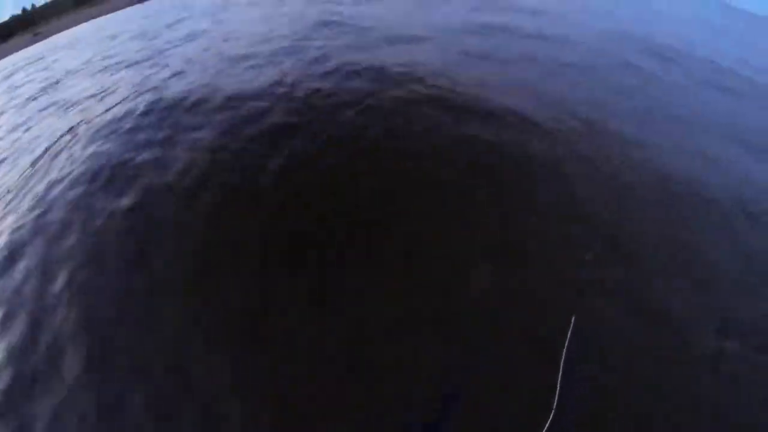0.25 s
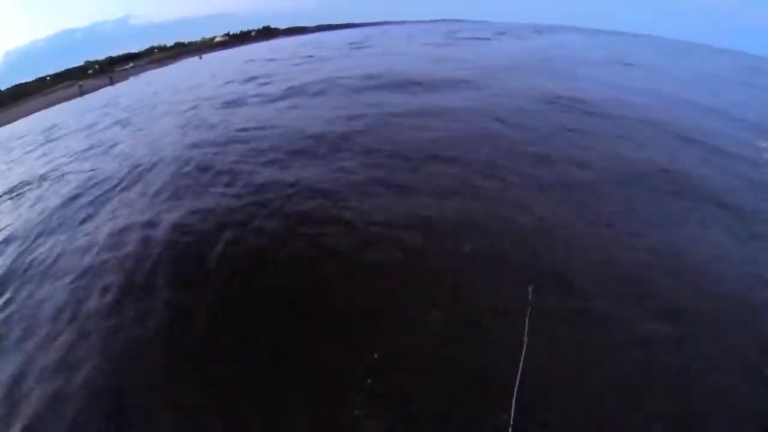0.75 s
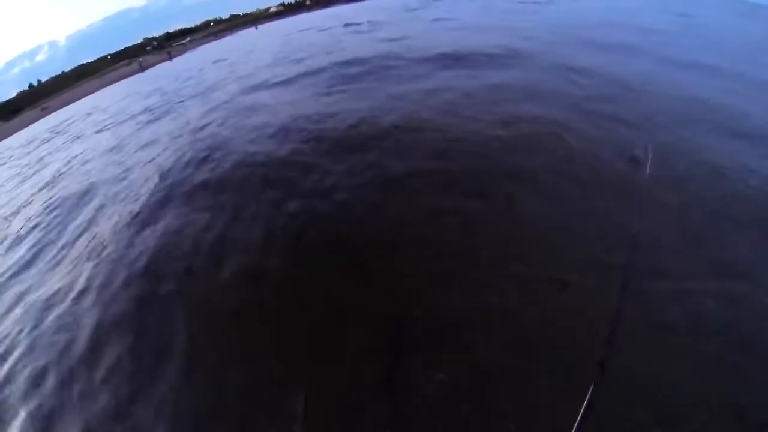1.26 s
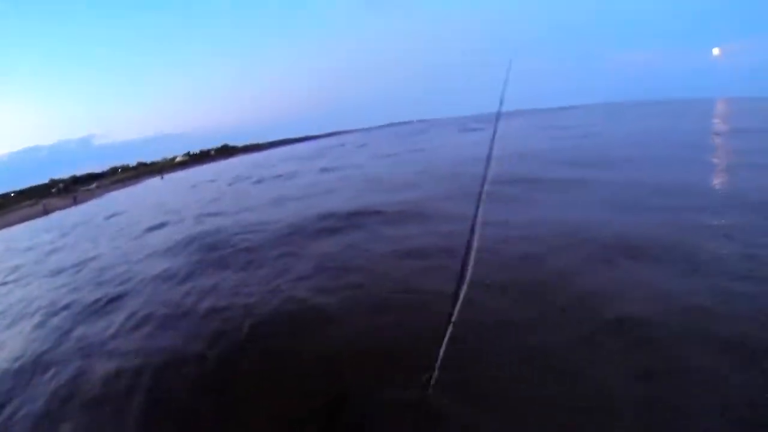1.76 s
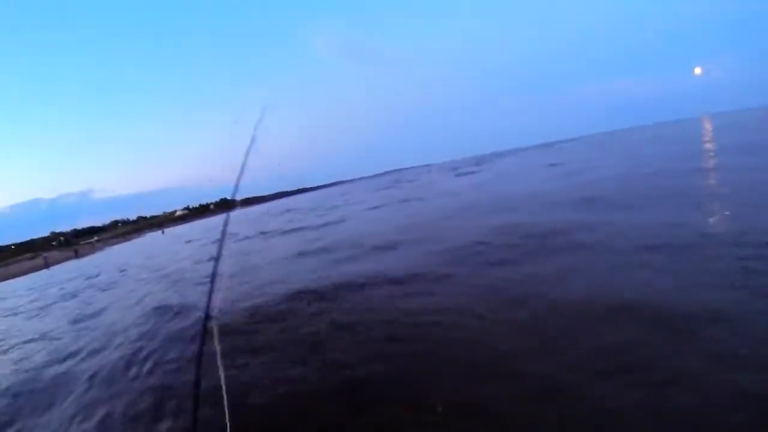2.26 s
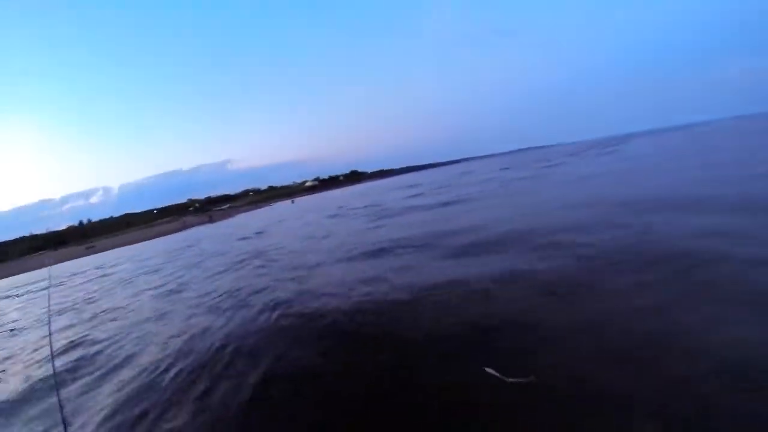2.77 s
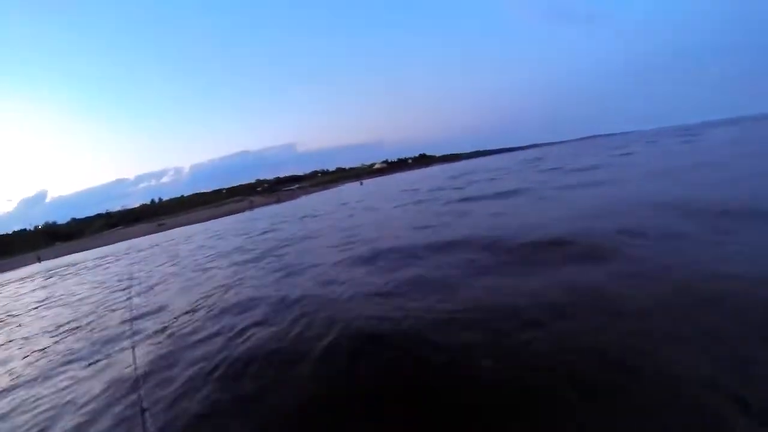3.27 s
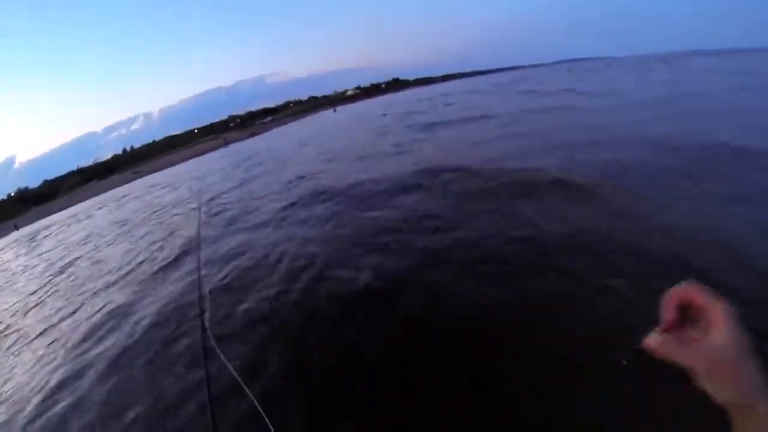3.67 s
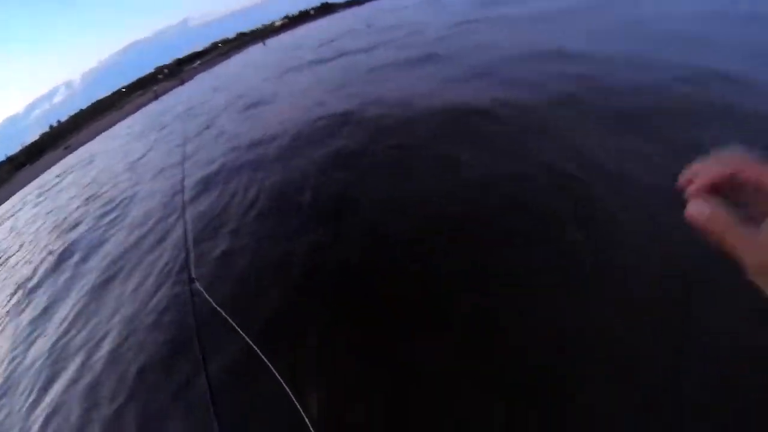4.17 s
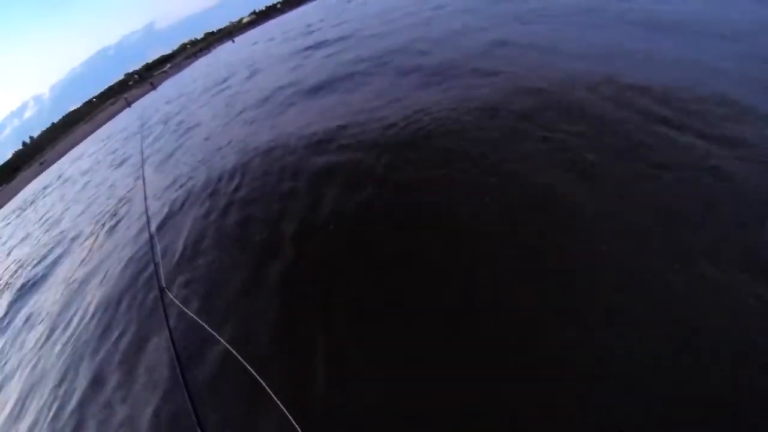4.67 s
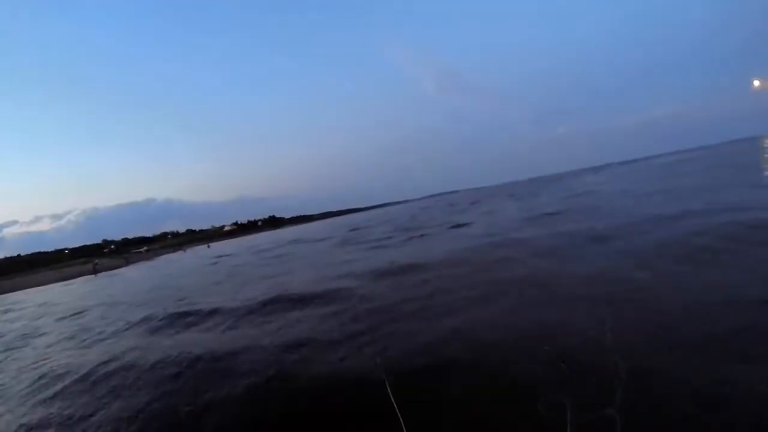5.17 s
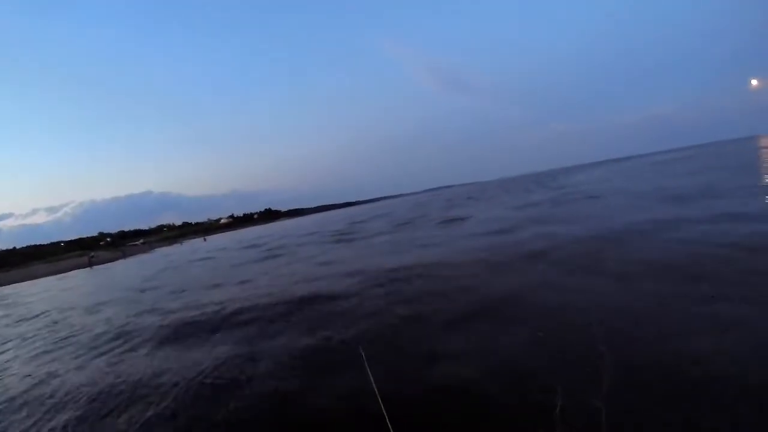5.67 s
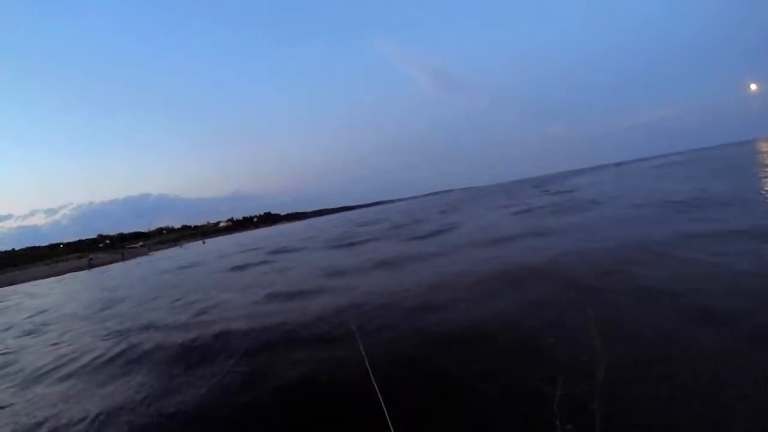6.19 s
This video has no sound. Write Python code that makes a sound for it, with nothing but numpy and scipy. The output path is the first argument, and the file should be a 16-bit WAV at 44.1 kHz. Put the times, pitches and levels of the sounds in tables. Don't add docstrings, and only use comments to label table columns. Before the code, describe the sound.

Muffled, boxy close sound from a waterproof case at sea. Very low wind rumble comes in short shoves and puffs, strongest in the first four seconds and calmer later. One crackling slosh of droplets lands early, leaving fine mist. Later come quiet plastic-sounding water taps, laps and little bubble blips. Underneath are steady soft hiss and a thin, buzzing high whine with tiny rapid ticks.

```python
import sys
import numpy as np
from scipy import signal
from scipy.fft import rfft, irfft
from scipy.io import wavfile
from scipy.ndimage import uniform_filter1d

SR = 44100
rng = np.random.default_rng(int(sys.argv[2]) if len(sys.argv) > 2 else 0)


def convert_level_to_amplitude(level_db):
    exponent = np.asarray(level_db, float) / 20
    return 10 ** exponent


def persist_wave(psi):
    counts = np.round(np.clip(psi, -1, 1) * 32767).astype(np.int16)
    wavfile.write(sys.argv[1], SR, np.atleast_2d(counts).T)


N = 283563
T = np.arange(N) / SR


def evened(x):
    return x / np.sqrt(np.mean(x ** 2) + 1e-20)


def smoothed(x, size):
    return uniform_filter1d(uniform_filter1d(x, size), size)


def add(mix, start_s, sound):
    part = mix[round(start_s * SR):][:len(sound)]
    part += sound[:len(part)]


def ring(hz, t60_s):
    t = np.arange(round(2.0 * t60_s * SR)) / SR
    fade = np.log(1000) * t / t60_s
    return fade * np.exp(1 - fade) * np.sin(2 * np.pi * hz * t)


def steadied(x, seconds, share):
    power = smoothed(x ** 2, round(seconds * SR / 2))
    return evened(x / (power + 0.009) ** (share / 2))


def swelling(base, swells):
    t = T[::128]
    power = convert_level_to_amplitude(2 * np.interp(t, *np.transpose(base)))
    for centre_s, peak_db, width_s in swells:
        power = power + convert_level_to_amplitude(2 * peak_db - 49 * ((t - centre_s) / width_s) ** 2)
    return np.interp(T, t, 10 * np.log10(power))


def flat(level_db):
    return [(0, level_db), (T[-1], level_db)]


def pulse(peak_db, hz, t):
    return convert_level_to_amplitude(peak_db) * np.hanning(len(t)) * np.sin(2 * np.pi * hz * t)


# start_s, level_db
BREEZE = [(0, -62.5), (.4, -58.5), (.62, -61), (.8, -53.5), (1.2, -56), (1.4, -48.5), (1.7, -47.5),
          (2.35, -61.5), (2.6, -50.5), (3.0, -53.5), (3.35, -64), (3.5, -53), (4.15, -51), (4.6, -54),
          (4.9, -58.5), (5.5, -58.5), (6.1, -60.5), (6.43, -55.5)]
# centre_s, peak_db, width_s
SHOVES = [(0.19, -44, 0.1), (0.3, -48, 0.054), (0.8, -43, 0.054), (0.98, -35.5, 0.067), (1.1, -27.5, 0.05),
          (1.18, -31.5, 0.057), (1.32, -45, 0.071), (1.43, -56, 0.065), (1.56, -23.5, 0.066),
          (2.29, -36.5, 0.073), (2.43, -43, 0.11), (2.56, -49, 0.05), (2.66, -42, 0.03), (2.93, -54, 0.52),
          (3.13, -55, 0.065), (3.3, -32, 0.035), (3.52, -39.5, 0.2), (3.87, -37.5, 0.26), (4.05, -35, 0.26),
          (4.27, -33.5, 0.028), (4.43, -37, 0.2), (4.74, -38.5, 0.1), (5.11, -43.5, 0.092)]
# centre_s, peak_db, width_s
PUFFS = [(0.1, -41.5, 0.066), (0.201, -46, 0.032), (0.3, -36, 0.032), (0.45, -37, 0.042),
         (0.55, -36, 0.031), (0.74, -33.5, 0.039), (0.95, -37, 0.038), (1.13, -32, 0.07), (1.22, -40, 0.03),
         (1.5, -43, 0.042), (1.62, -55, 0.077), (1.71, -39.5, 0.042), (1.8, -27, 0.024),
         (2.06, -38.5, 0.098), (2.23, -36, 0.075), (2.41, -43, 0.069), (2.48, -34.5, 0.044),
         (2.59, -31.5, 0.041), (2.7, -47, 0.027), (2.9, -49, 0.084), (3.15, -37.5, 0.048),
         (3.28, -39, 0.035), (3.45, -30, 0.028), (3.6, -32.5, 0.07), (3.689, -22.5, 0.022),
         (3.85, -39, 0.028), (3.95, -39, 0.15), (4.06, -32.5, 0.091), (4.17, -42, 0.04), (4.42, -36, 0.049),
         (4.69, -51, 0.11)]
# centre_s, peak_db, width_s
FLAPS = [(0.29, -44, 0.025), (0.44, -59, 0.037), (0.75, -60, 0.034), (0.81, -40.5, 0.052), (0.9, -52, 0.04),
         (0.98, -57, 0.05), (1.06, -47, 0.027), (1.15, -45, 0.077), (1.58, -47, 0.13), (1.74, -64, 0.03),
         (1.81, -66, 0.05), (2.15, -64, 0.027), (2.22, -56, 0.13), (2.56, -58, 0.044), (2.65, -58, 0.04),
         (2.77, -61, 0.045), (3.14, -56, 0.065), (3.48, -49, 0.091), (3.6, -46, 0.073), (3.95, -42, 0.1),
         (3.28, -53, .05), (4.4, -66, 0.046), (4.76, -53, .05), (4.83, -63, 0.05), (5.0, -75, 0.041),
         (5.92, -55, 0.03), (6.07, -53, 0.073)]
# centre_s, depth_db, width_s
LULLS = [(.37, -1, .04), (.6, 13, 0.08), (.87, 2, 0.037), (1.37, 4, 0.14), (1.66, 5, .03), (2.34, 3, 0.046),
         (2.97, 9, .05), (3.35, 5, 0.041), (3.76, 15, 0.045), (4.34, 21, .04), (4.58, 8, 0.087),
         (4.92, 10, 0.1), (5.28, 1, 0.087), (5.53, 13, 0.071), (5.78, 20, 0.047), (5.9, 12, 0.084),
         (6.23, 24, 0.037)]
# low_hz, high_hz, upper_slope_steepness
EDDIES = [
    (8.5, 12.9, 2.53),
    (23.4, 37.6, 7.2),
    (48.4, 61.4, 2.05),
    (96, 193, 1),
]
# level_db at middling wind, share of the wind's swings
FOLLOW = [
    (-46.5, 0.9),
    (-49, 0.63),
    (-60.5, 0.47),
    (-62, 0.17),
]


def wind(middling_db=-50, flap_lift_db=10):
    hz = np.fft.rfftfreq(N, 1 / SR) + 0.0005
    out = np.zeros(N)
    flaps = [(s, db + flap_lift_db, width_s) for s, db, width_s in FLAPS]
    slack_db = np.zeros(len(T[::128]))
    for centre_s, depth_db, width_s in LULLS:
        bell = 2.6 * ((T[::128] - centre_s) / width_s) ** 2
        slack_db += depth_db * np.exp(-np.clip(bell, 0, 50))
    slack_db = np.interp(T, T[::128], slack_db)
    push_db = swelling(BREEZE, SHOVES)
    puff_db = swelling(BREEZE, PUFFS) - slack_db
    flap_db = swelling(BREEZE, flaps) - slack_db
    drives_db = (push_db, puff_db, flap_db, flap_db)
    for (low_hz, high_hz, steep), (level_db, share), drive_db in zip(EDDIES, FOLLOW, drives_db):
        shape = 1 / np.sqrt((1 + (low_hz / hz) ** 8) * (1 + (hz / high_hz) ** (2 * steep)))
        eddies = evened(irfft(rfft(rng.standard_normal(N)) * shape, N))
        gusts = smoothed(convert_level_to_amplitude(level_db + share * (drive_db - middling_db)), 900)
        pushed = gusts * steadied(eddies, 4.4 / low_hz, 0.87)
        second_slope = np.sqrt(1 + (hz / high_hz / 1.6) ** (2 * steep))
        out += irfft(rfft(pushed) / second_slope, N)
    return out


# start_s, peak_db, ring_hz, bright_db re ring, t60_s
SPATTER = [
    (0.6154, -56.5, 1740, 4, 0.0065),
    (0.8115, -50, 1200, -14, 0.008),
    (0.864, -60, 1700, -3, 0.01),
    (0.903, -53.5, 1250, -9, 0.012),
    (3.8534, -53.5, 1450, -8, 0.0089),
    (4.3805, -52, 1385, -12, 0.02),
    (6.003, -55, 1510, -22, 0.02),
]
# mode_hz, level_db, t60_s
GLINTS = [(3020, 2, 0.0023), (4400, -3.5, 0.0021), (2370, 1, 0.0026), (1790, 2, 0.0055),
          (11140, -10.5, 0.004), (7000, 0, 0.00067)]


def spatter():
    out, t = np.zeros(N), np.arange(900) / SR
    for start_s, peak_db, ring_hz, bright_db, t60_s in SPATTER:
        impact = 0.71 * np.exp(-t / 0.00022)
        droplets = rng.standard_normal(900) * np.minimum(t / 0.004, 1)
        burst = (impact + droplets) * convert_level_to_amplitude(-60 * t / t60_s)
        low = np.convolve(burst * np.cos(2 * np.pi * ring_hz * t), ring(ring_hz, 0.01))
        add(out, start_s, convert_level_to_amplitude(peak_db) * low / abs(low).max())
        for glint_hz, glint_db, glint_t60_s in GLINTS:
            high = np.convolve(burst, ring(glint_hz * rng.uniform(1.0, 1.01), glint_t60_s))
            add(out, start_s, convert_level_to_amplitude(peak_db + bright_db + glint_db) * high / abs(high).max())
    return out


# centre_s, peak_db, ring_hz, width_ms
KNOCKS = [(.561, -55, 1440, 6.3), (.606, -58, 1510, 6.9), (.617, -47.5, 3660, 3.6), (.6172, -59, 5160, 2.6),
          (0.619, -47, 1530, 3), (0.6222, -44.5, 1440, 5.4), (0.629, -54, 1420, 5.7),
          (.6625, -53, 1400, 2.5), (0.666, -48, 1388, 4.5), (.6732, -51, 1422, 4),
          (0.679, -39.5, 1390, 2.9), (.695, -55, 1480, 4), (0.7055, -44.5, 1530, 4.1),
          (.72, -58, 1536, 4.4), (.738, -59, 1430, 6), (.7565, -56, 1448, 3.2), (.765, -53, 1385, 3.2),
          (0.776, -53, 1355, 2.4), (0.789, -52, 1498, 1.6), (0.806, -58, 1280, 4.6), (.8138, -41, 1520, 2),
          (0.816, -38.5, 1390, 2.9), (.816, -56, 2300, 1.7), (.8235, -55, 2300, 1.1),
          (0.829, -57, 1556, 2.4), (.85, -55, 1436, 3), (.822, -45, 1420, 3.3), (0.8373, -49, 1440, 3.1),
          (0.8412, -41, 1450, 1.3), (0.8448, -44, 1494, 1.8), (0.8546, -55, 1550, 3.4),
          (.8623, -48, 1532, 2), (0.8657, -43, 1380, 1.6), (.8655, -58, 2700, 1), (.869, -53, 1450, 2),
          (0.873, -55, 1310, 3.5), (.8781, -50, 1477, 2), (0.8816, -55, 1500, 2.3), (0.89, -51, 1572, 3),
          (.9065, -51, 1440, 2.5), (.9035, -60, 2500, 1), (0.911, -53, 1322, 4.3), (0.919, -53, 1330, 3.5),
          (.926, -58, 1440, 4), (.938, -55, 1352, 2), (.9954, -59, 1508, 4.1), (1.0207, -54, 1530, 2.4),
          (1.52, -59, 1509, 1.6), (1.543, -52, 1550, 1.9), (1.5455, -61, 1469, 2.7), (1.537, -55, 1550, 2.5),
         (1.572, -54, 1700, 5.5), (1.5948, -56, 1421, 1.8), (1.664, -55.5, 1740, 4.6),
         (2.5525, -55, 1500, 3.5), (2.598, -57, 1570, 2.6), (4.3805, -55, 3500, .9), (0.57, -59, 2600, .7),
         (.6165, -61, 4400, .7), (.803, -63, 3000, .6), (.935, -64.5, 4450, 3), (.728, -63, 2400, 2.5),
         (.69, -62, 2500, 2)]
# start_s, peak_db, ring_hz
SLAPS = [(2.9388, -55, 1480), (2.9607, -54, 1400), (3.2128, -58, 1410), (3.2682, -49, 1510),
         (3.3079, -57, 1460), (3.4855, -54, 1450), (3.6028, -55, 1450), (4.1001, -63, 1540),
         (4.4354, -56, 1430), (5.061, -55, 1340), (5.505, -56, 1350), (5.8507, -57, 1480),
         (6.142, -57, 1410), (6.4004, -56, 1550), (4.60, -54, 1450), (4.69, -52, 1400), (4.72, -52, 1500),
         (3.378, -45, 1442), (3.4119, -53, 1360), (3.4358, -52, 1460), (3.6234, -55, 1500),
         (3.7156, -51, 1540), (3.7566, -52, 1460), (3.7806, -53, 1430), (3.853, -53, 1400),
         (4.159, -46, 1460), (4.188, -57, 1350), (4.235, -45, 1570), (4.3807, -48, 1370),
         (4.4236, -54, 1410), (4.648, -48, 1390), (4.7543, -53, 1410), (4.931, -58, 1310),
         (5.147, -46, 1380), (5.4543, -56, 1450), (5.669, -51, 1590), (5.7446, -49, 1570),
         (5.948, -58, 1500), (6.0023, -48, 1540), (6.1086, -51, 1320)]
# centre_s, peak_db, ring_hz
PINGS = [(.6094, -64, 3610), (.6285, -61, 3541), (.6357, -64, 3476), (0.626, -61, 5300), (.634, -65, 5240),
         (.643, -70, 5200), (.6717, -58, 3623), (.69, -60, 3560), (.7228, -57.5, 3626), (.7337, -62, 3607),
         (.7495, -63, 3649), (.8093, -70, 5373), (.8194, -62, 3582), (.8242, -62, 3600), (.8421, -64, 3760),
         (.854, -72, 3600), (.866, -60, 3600), (.944, -67, 3504), (.949, -70, 3550), (1.0205, -63, 3380),
         (1.028, -63, 3700)]


def pings(slap_ms=2.98, slap_db=-7.5, ping_ms=2.6):
    out = np.zeros(N)
    slaps = [(s + slap_ms / 2000, db + slap_db, hz, slap_ms) for s, db, hz in SLAPS]
    fine = [(*ping, ping_ms) for ping in PINGS]
    for centre_s, peak_db, ring_hz, width_ms in KNOCKS + slaps + fine:
        t = np.arange(-width_ms, width_ms, 1000 / SR) / 1000
        add(out, centre_s + t[0], pulse(peak_db, ring_hz, t))
    return out


# mode_hz, width_hz, level_db
SHELL = [
    (1330, 365, 5.5),
    (1590, 280, 6),
    (2157, 1230, 1),
    (3600, 630, -9),
    (4820, 2560, -11),
    (2480, 235, -11.5),
    (1900, 190, -10),
]


def shell_response(modes):
    shell = np.zeros(4000)
    for k, (mode_hz, width_hz, level_db) in enumerate(modes):
        add(shell, 0, (-1) ** k * convert_level_to_amplitude(level_db) * width_hz * ring(mode_hz, 1.92 / width_hz))
    return shell


def washed(shell, drops_per_s=900, spread_db=2.5, wash_db=0.0):
    sizes = convert_level_to_amplitude(spread_db * np.minimum(rng.exponential(1, N), 5))
    drops = sizes * (rng.random(N) < drops_per_s / SR)
    drive = evened(drops * rng.choice([-1., 1.], N)) + convert_level_to_amplitude(wash_db) * rng.standard_normal(N)
    return steadied(signal.oaconvolve(drive, shell)[:N], 0.1, 0.13)


# start_s, low_ring_db
LAP = [(0, -64.5), (.45, -66), (.55, -69), (.7, -64), (.83, -59), (.95, -66.5), (1.15, -67.5),
       (1.45, -72.5), (1.9, -69.5), (2.5, -68.5), (3.0, -69), (3.3, -65), (4.1, -64), (4.8, -63),
       (4.86, -66.5), (5.5, -67), (5.9, -68.5), (6.43, -67.5)]
# centre_s, peak_db, width_s
WAVELETS = [(1.56, -65, 0.34), (1.97, -74, 0.031), (2.6, -66.5, 0.062), (2.96, -69, 0.061),
            (3.08, -65, .02), (3.15, -64, 0.038), (3.64, -65, 0.04), (4.01, -64, 0.054), (4.2, -65, 0.091),
            (3.88, -68, 0.044), (4.65, -68, 0.049), (4.78, -64, 0.062), (4.98, -65, 0.052),
            (5.15, -66, 0.038), (5.26, -63, 0.025), (5.96, -64.5, 0.044), (6.07, -64, 0.11),
            (6.27, -70, .06)]
# centre_s, lift_db, width_s
SPRAY = [(.635, -3, .03), (.72, 2.5, 0.08), (.83, -0.5, 0.091), (.93, 0, 0.073), (1.0, -2, 0.092)]


def lapping(water_db):
    edges_hz = (1140, 1738)
    bandpass = signal.butter(2, edges_hz, "bandpass", fs=SR, output="sos")
    low = washed(signal.sosfilt(bandpass, shell_response(SHELL[:2])))
    bright = washed(shell_response(SHELL[2:]))
    bright_db = -72 + 0.64 * (water_db + 66.5) + swelling(flat(0), SPRAY)
    return convert_level_to_amplitude(water_db) * low + convert_level_to_amplitude(bright_db) * bright


def pocket(water_db, pocket_hz=1374, width_hz=108, level_db=-73.5, share=2):
    stir = rng.standard_normal(N)
    gurgle = evened(signal.oaconvolve(stir, ring(pocket_hz, 1.76 / width_hz))[:N])
    return convert_level_to_amplitude(level_db + share * (water_db + 64)) * gurgle


# centre_s, peak_db, width_s
MIST = [(.635, -72, 0.06), (.69, -73, .02), (.74, -80, 0.1), (.83, -79, 0.25), (.94, -71, 0.13),
        (1.02, -79, 0)]
# mode_hz, t60_s, level_db
MIST_MODES = [(3560, 0.0066, -3), (5150, 0.004, -11), (4340, 0.0048, -10)]


def mist():
    stir, out = rng.standard_normal(N), np.zeros(N)
    for mode_hz, t60_s, level_db in MIST_MODES:
        out += convert_level_to_amplitude(level_db) * evened(signal.oaconvolve(stir, ring(mode_hz, t60_s))[:N])
    return convert_level_to_amplitude(swelling(flat(-95), MIST)) * out


# start_s, peak_db, wobble_hz, length_s
BUMPS = [(1.268, -54.5, 142, 0.053), (1.865, -54, 140, 0.028), (1.998, -46, 123.3, 0.04),
         (2.111, -49, 106, 0.031), (2.2, -47, 109, 0.049), (2.248, -54, 108, 0.054),
         (2.802, -55.5, 110, 0.053), (3.167, -52, 104.3, 0.091), (3.66, -52, 138, 0.047),
         (6.072, -62, 76.5, 0.15), (3.802, -62.5, 212, 0.035)]


def bumps():
    out = np.zeros(N)
    for start_s, peak_db, wobble_hz, length_s in BUMPS:
        add(out, start_s, pulse(peak_db, wobble_hz, np.arange(round(length_s * SR)) / SR))
    return out


# start_s, peak_db, start_hz, end_hz, length_s
BUBBLES = [(0.782, -66, 1900, 2500, 0.017), (2.642, -60, 2490, 2580, 0.012),
           (2.654, -67, 2750, 2900, 0.018), (2.668, -64, 2600, 2850, .018), (2.807, -62, 1350, 1560, 0.021),
           (3.901, -62, 1540, 1920, 0.023), (3.061, -57, 1062, 1504, 0.03), (3.053, -67, 880, 1060, .014),
           (4.268, -68, 1260, 1610, 0.018), (4.428, -59, 1398, 1434, 0.032),
           (6.043, -64, 1315, 1390, 0.034), (6.102, -58, 1380, 1300, .035), (6.241, -64, 1407, 1250, 0.049),
           (6.285, -67, 1310, 1430, 0.039)]


def bubbles():
    out = np.zeros(N)
    for start_s, peak_db, start_hz, end_hz, length_s in BUBBLES:
        hz = np.linspace(start_hz, end_hz, round(length_s * SR))
        add(out, start_s, convert_level_to_amplitude(peak_db) * np.hanning(len(hz)) * np.sin(2 * np.pi * np.cumsum(hz) / SR))
    return out


# time_s, pitch_hz, level_db
WHISTLE = [
    (1.952, 1383, -74),
    (1.976, 1387, -58),
    (1.998, 1395, -62),
    (2.022, 1360, -60.5),
    (2.045, 1305, -66.5),
    (2.074, 1240, -70.5),
    (2.105, 1165, -75),
]


def whistle(waver_hz=4):
    time_s, pitch_hz, level_db = np.transpose(WHISTLE)
    t, out = np.arange(time_s[0], time_s[-1], 1 / SR), np.zeros(N)
    waver = waver_hz * evened(uniform_filter1d(rng.standard_normal(len(t)), size=300))
    hz = np.interp(t, time_s, pitch_hz) + waver
    tone = np.sqrt(2) * np.sin(2 * np.pi * np.cumsum(hz) / SR)
    level = convert_level_to_amplitude(np.interp(t, time_s, level_db))
    add(out, time_s[0], level * tone * signal.windows.tukey(len(t), .2))
    return out


FRAME_HZ = 59.94
# start_share, end_share, pitch_hz, scatter_hz, peak_db, heavy_peak_db
WHINES = [
    (0.121, 0.498, 7536, 98.6, -68, -64.5),
    (0.587, 1.014, 7486, 56.75, -72.5, -73.5),
]
HEAVY = [
    np.r_[11:290:15, 303:390:15],
    np.r_[3:300:15, 310:390:15],
]


def whines(heavy_hz=8200, waver_hz=120, scatter_db=1.0, locked_db=-84):
    frame, place = np.divmod(T * FRAME_HZ, 1)
    frame, out = frame.astype(int), np.zeros(N)
    locked = convert_level_to_amplitude(locked_db) * np.sin(2 * np.pi * 126 * FRAME_HZ * T)
    for (start, end, pitch_hz, scatter_hz, peak_db, heavy_db), heavy in zip(WHINES, HEAVY):
        chance = rng.standard_normal((frame[-1] + 1, 2))[frame]
        loaded = np.isin(frame, heavy)
        waver = waver_hz * evened(uniform_filter1d(rng.standard_normal(N), size=60))
        hz = np.where(loaded, heavy_hz, pitch_hz + scatter_hz * chance[:, 0]) + waver
        gate = np.clip(np.minimum(place - start, end - place) / 0.0057, 0, 1)
        level_db = np.where(loaded, heavy_db, peak_db + scatter_db * chance[:, 1])
        out += gate * (convert_level_to_amplitude(level_db) * np.sin(2 * np.pi * np.cumsum(hz) / SR) + locked)
    return out


# start_share, length_share, pitch_hz, peak_db
OVERSHOOTS = [
    (.13, 0.23, 8190, -76),
    (.56, 0.094, 8230, -72.5),
    (.74, 0.09, 8040, -82),
]


def overshoots(scatter_db=5.7, scatter_hz=150):
    frame, place = np.divmod(T * FRAME_HZ, 1)
    frame, out = frame.astype(int), np.zeros(N)
    for start, length, pitch_hz, peak_db in OVERSHOOTS:
        size, detune, turn = rng.standard_normal((frame[-1] + 1, 3))[frame].T
        gate = np.sin(np.pi * np.clip((place - start) / length, 0, 1))
        cycles = (pitch_hz + scatter_hz * detune) * place / FRAME_HZ + turn
        out += convert_level_to_amplitude(peak_db + scatter_db * size) * gate * np.sin(2 * np.pi * cycles)
    return out


# frame_share, peak_db, ring_hz, t60_s
EDGES = [(.492, -68, 3050, .004), (.992, -68, 3050, .004), (.51, -72, 3600, .005), (.01, -72, 3600, .005),
         (.6, -75, 5100, .004), (.1, -75, 5100, .004), (.48, -67, 10000, .0004), (.55, -70, 10000, .0004),
         (.58, -67, 10000, .0004), (.64, -69, 10000, .0004), (.11, -68, 10000, .0004),
         (.14, -70, 10000, .0004), (.19, -70, 10000, .0004), (.98, -68, 10000, .0004)]


def ticks():
    out = np.zeros(N)
    for share, peak_db, ring_hz, t60_s in EDGES:
        t = np.arange(round(t60_s * SR)) / SR
        tick = convert_level_to_amplitude(peak_db - 60 * t / t60_s) * np.sin(2 * np.pi * ring_hz * t)
        for k in range(int(T[-1] * FRAME_HZ) + 1):
            add(out, (k + share) / FRAME_HZ, tick)
    return out


TREBLE_HZ = 12850
# freq_hz, level_db
FLOOR_COLOUR = [(60, 12), (150, -10.5), (300, -14), (600, -14), (1000, -16.5), (2000, -29.5), (3000, -21),
                (5000, -28.5), (7000, -31), (9500, -30), (11800, -35), (13500, -28.5), (14300, -36), (15300, -25)]


def floor(level_db=-63, patchy_db=1.5, flicker_db=2.2):
    frames, hz = N // 256 + 5, np.fft.rfftfreq(1024, 1 / SR)
    a, b, patches = rng.standard_normal((frames, 513, 3)).T
    patches = uniform_filter1d(uniform_filter1d(patches, size=10, axis=0), size=12, axis=1)
    freq_hz, freq_db = np.transpose(FLOOR_COLOUR)
    colour_db = np.interp(np.log(hz + 1), np.log(freq_hz), freq_db) - 40 * (hz < 60)
    flicker = evened(uniform_filter1d(rng.standard_normal(frames), size=2)) * (hz[:, None] > TREBLE_HZ)
    z = (a + 1j * b) * convert_level_to_amplitude(colour_db[:, None] + patchy_db * evened(patches) + flicker_db * flicker)
    return convert_level_to_amplitude(level_db) * evened(signal.istft(z, nperseg=1024, noverlap=768)[1][:N])


def scene():
    water_db = swelling(LAP, WAVELETS)
    water = spatter() + pings() + lapping(water_db) + pocket(water_db) + mist() + bubbles()
    supply = whines() + overshoots() + ticks()
    return (wind() + water + bumps() + whistle() + supply + floor())[None]


def roll_off(x):
    return signal.sosfilt(signal.butter(12, 15570, fs=SR, output="sos"), x)


# start_s, end_s
STARVED = [(1.08, 1.12), (1.165, 1.228), (3.56, 3.7), (3.812, 3.935), (3.985, 4.105), (4.41, 4.445)]


def record(dry):
    hz, t, z = signal.stft(dry, SR, nperseg=256)
    starved = np.any([(t > start_s) & (t < end_s) for start_s, end_s in STARVED], axis=0)
    survives = np.repeat(rng.random(len(t) // 2 + 1) < .3, 2)[:len(t)]
    scraps = survives & (hz[:, None] > 14350) & (hz[:, None] < 15200)
    gain = np.where(starved & (hz[:, None] > TREBLE_HZ), 2.0 * scraps, 1)
    thinned = signal.istft(z * gain, SR, nperseg=256)[1][:, :N]
    above_hz = np.fft.rfftfreq(N, 1 / SR) - 15380
    limit_db = -np.clip(above_hz / 4, 0, 60) - 8.7 * (above_hz > 0)
    mix = irfft(rfft(thinned) * convert_level_to_amplitude(limit_db), N)
    return roll_off(mix)


dry = scene()
out = record(dry)
persist_wave(out)
```